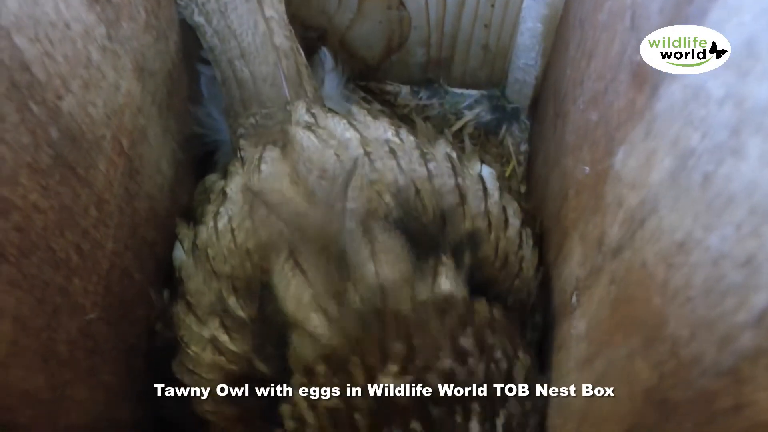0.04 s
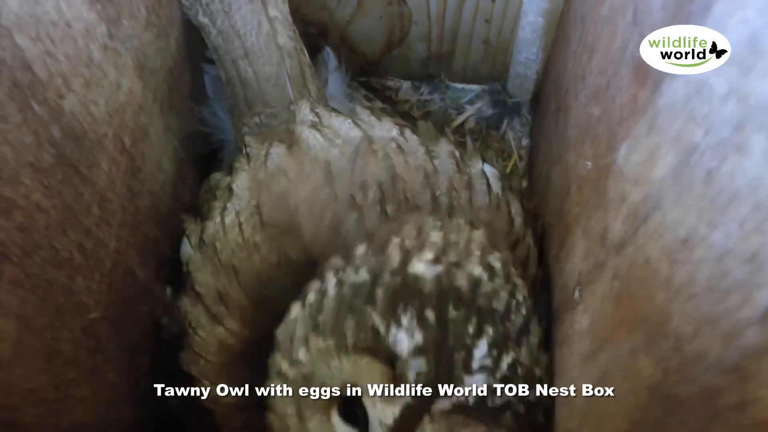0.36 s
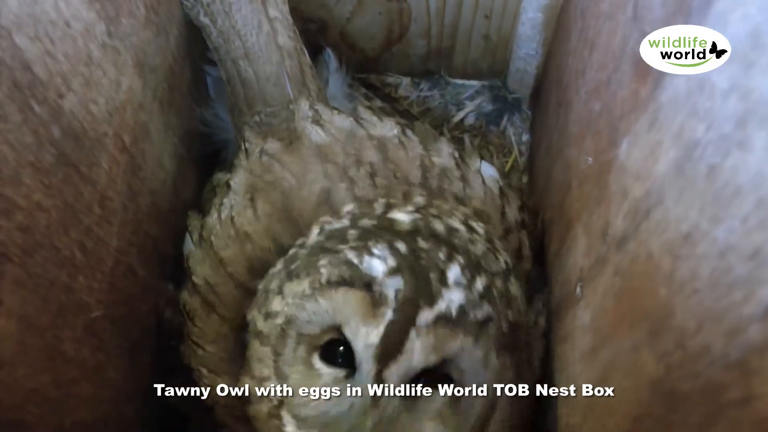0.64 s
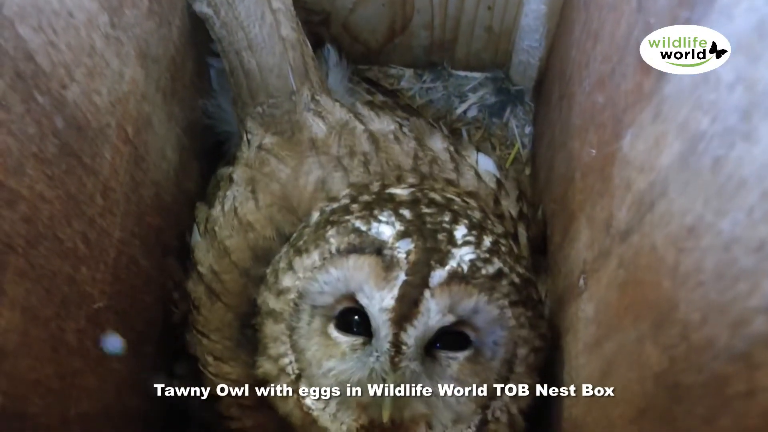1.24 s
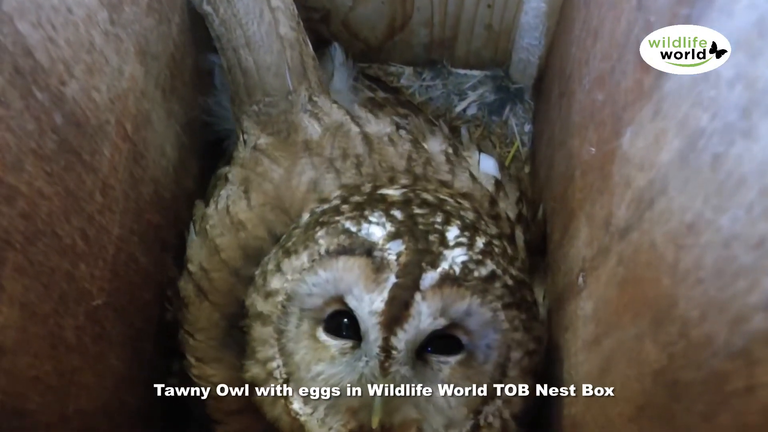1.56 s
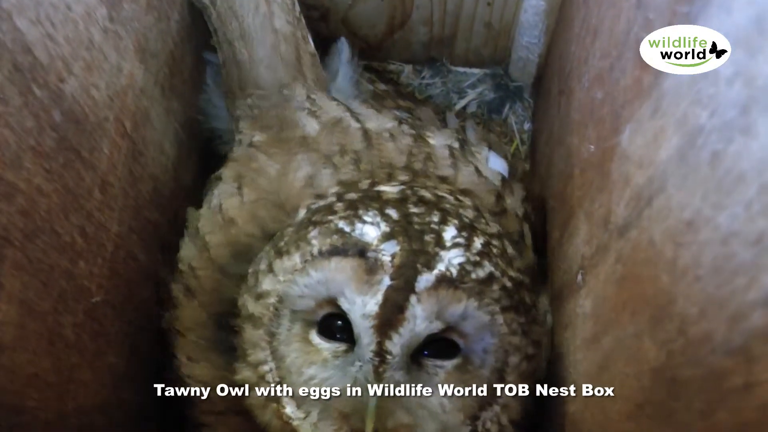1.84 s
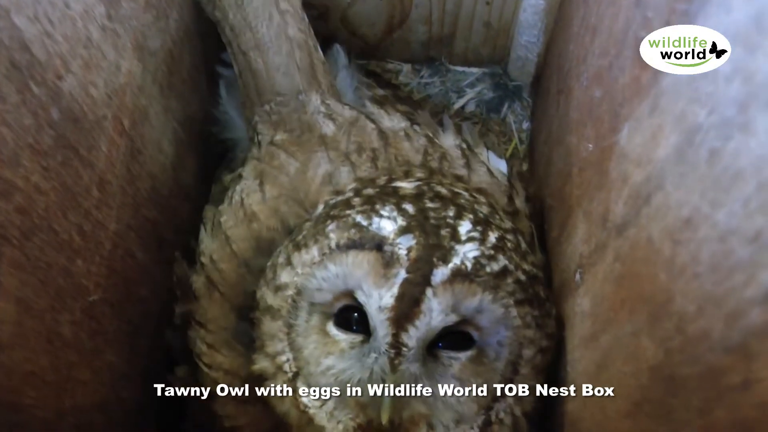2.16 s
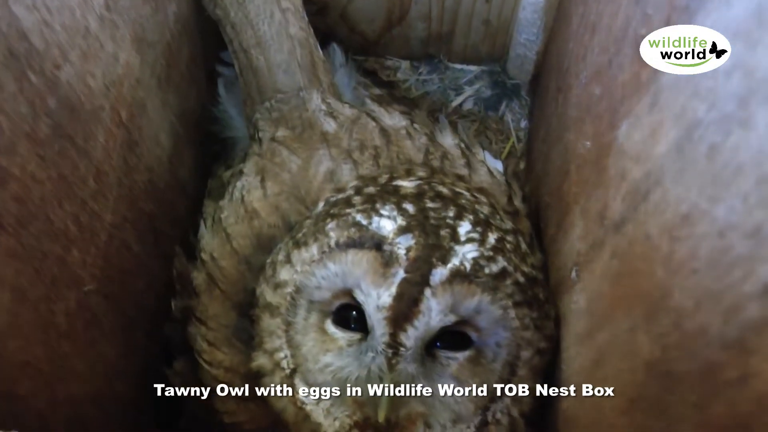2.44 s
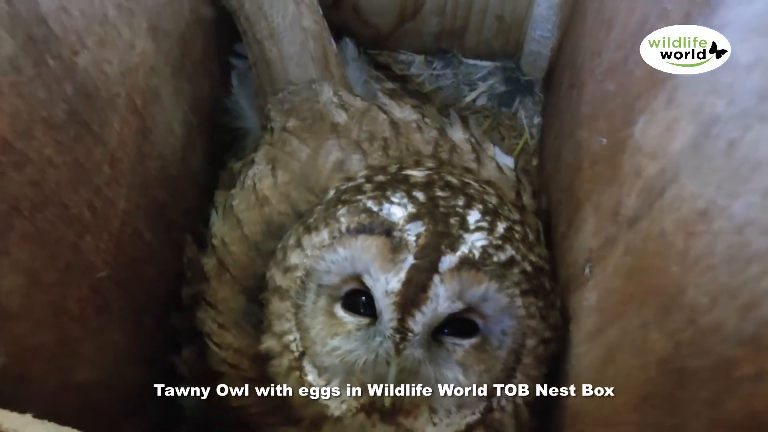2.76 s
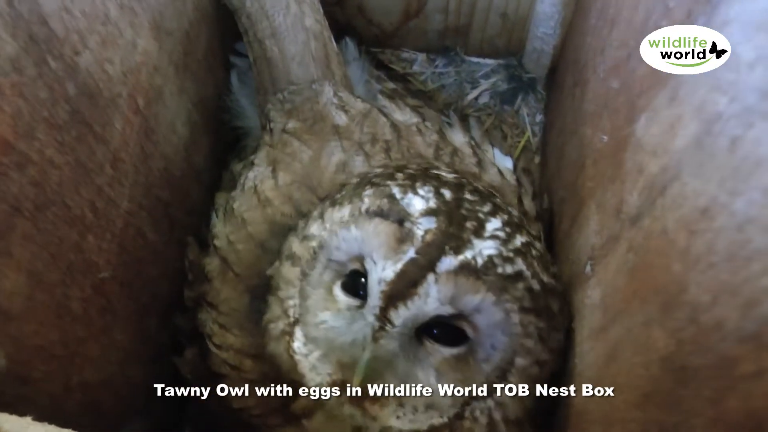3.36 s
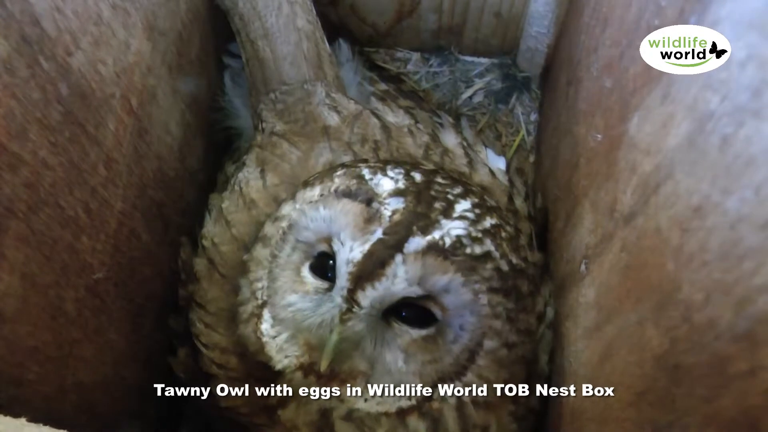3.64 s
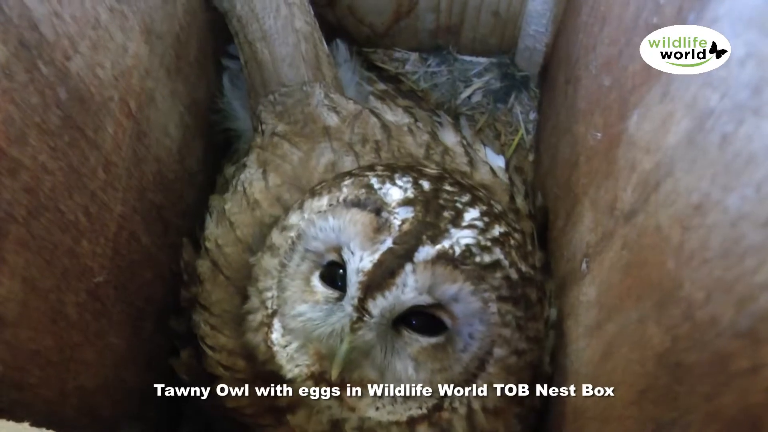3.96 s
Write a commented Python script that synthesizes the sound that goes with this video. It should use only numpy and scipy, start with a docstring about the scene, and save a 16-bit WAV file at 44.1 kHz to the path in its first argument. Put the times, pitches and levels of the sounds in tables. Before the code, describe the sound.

Songbirds chirp faintly outside while an owl shifts and bumps softly in a wooden box.

```python
"""Inside a wooden nest box an owl shifts: soft bumps ring the box and straw ticks, while songbirds
outside, blurred by the trees and the box, twitter and whistle a falling sweep. High buzzy notes follow.
Just before 2 s comes one brief scratchy rustle, then a second sweep, more bumps and three dull thuds.
A last sweep and a few faint calls close the scene. A low hum and quiet outdoor air lie under it all,
and the right microphone hears most of the sound."""
import sys
import numpy as np
from scipy import signal
from scipy.fft import rfft, irfft
from scipy.io import wavfile
from scipy.ndimage import uniform_filter1d

SR = 44100
rng = np.random.default_rng(int(sys.argv[2]) if len(sys.argv) > 2 else 0)


def master(y):
    """Save y as 16-bit WAV."""
    cut = np.clip(np.atleast_2d(y).T, -1, 1)
    pcm = np.round(cut * 32767)  # scale
    wavfile.write(sys.argv[1], SR, pcm.astype(np.int16))


N = 176400
TIME = np.arange(N) / SR
BODY_LEFT_DB, STRAW_LEFT_DB, BIRD_LEFT_DB, LEFT_LAG_S = -8.5, -16, -12.5, .0006


# The hollow ring of the box. Each row: mode in Hz, relative level in dB, seconds to fall 60 dB.
BOX_MODES = [(176.2, -1.5, 0.15), (253, 5, 0.058), (299.8, -1.5, 0.11), (358.3, -0.5, 0.05),
             (613, -6, 0.077), (663, -9, 0.067), (910, -17, 0.11), (1133, -17, 0.054)]
# The owl against the wood. Each row: start in seconds, peak in dB, ring centre in Hz, brightness in dB.
OWL_BUMPS = [(.004, -32, 233, -19), (0.028, -25, 216.4, -16), (0.043, -27.5, 240, -24),
             (.093, -16, 243, -16), (0.112, -24, 288, -22), (0.153, -26, 235, -18), (0.232, -18, 258, -26),
             (0.239, -24, 246, -20), (0.258, -22.5, 228, -6), (0.306, -28, 236, -22),
             (0.331, -22, 213.6, -14), (0.353, -28, 255, 0), (0.44, -34, 308, -24), (1.732, -29.5, 292, 8),
             (1.85, -26, 259, -20), (1.866, -21, 246, 7.5), (2.223, -15.5, 376, -8),
             (2.242, -29.5, 170, -11), (2.261, -25.5, 370, 2), (2.465, -29.5, 364, -4),
             (2.492, -36, 375, -20), (2.532, -26.5, 382, -10), (2.565, -22.5, 390, -16),
             (2.59, -24.5, 395, -13), (2.633, -30, 402, -17), (2.667, -15, 368, -2.5)]

def owl_bumps(contact_s=.0063, spread_oct=.24, bright_above_hz=480, left_db_per_oct=-7.5):
    """Soft blows ring the box; where and how hard they land picks the modes that speak."""
    out = np.zeros((2, N))
    t = np.maximum(np.arange(SR // 4) / SR - np.array([[LEFT_LAG_S], [0]]), 0)
    soft_onset = np.sin(np.pi / 2 * np.minimum(t / contact_s, 1)) ** 2
    for start, db, centre, bright_db in OWL_BUMPS:
        ring = 0
        for hz, mode_db, t60 in BOX_MODES:
            nearness = np.exp(-.5 * (np.log2(hz / centre) / spread_oct) ** 2)
            weight = undb(bright_db) if hz > bright_above_hz else nearness
            detune = 1 + .0085 * rng.standard_normal()
            mode = np.sin(2 * np.pi * hz * detune * t) * undb(mode_db - 60 * t / t60)
            left_db = BODY_LEFT_DB + left_db_per_oct * np.log2(hz / BOX_MODES[2][0])
            ring += weight * mode * undb([[left_db], [0]])
        ring *= soft_onset
        add(out, start, undb(db) * ring / np.abs(ring).max())
    return out


# The dry body of a tick, and the bright snap on top. Each row: frequency in Hz, gain in dB.
TICK_EQ = [(800, 3), (2000, 14), (3500, 10.5), (5500, 11.5), (7500, -10), (10000, -23), (15000, -30)]
SNAP_EQ = [(3500, -14), (7000, 4.5), (8500, 0.5), (10500, -1), (15000, -12)]
# Ticks in the straw. Each row: crest in seconds, level in dB, brightness in dB.
STRAW_TICKS = [(0.262, -46, -4), (0.536, -54, 5), (0.62, -43, -2.5), (0.839, -42, -9), (0.888, -57, 13),
               (1.458, -43, -12), (1.701, -40, -9.5), (2.225, -37, -13), (2.263, -44, -8),
               (2.565, -33.5, -10.5), (2.59, -59, -12), (2.667, -31.5, -5.5), (2.806, -37.5, -7),
               (3.494, -46, 1)]

def straw_ticks(rise_s=.0012, fall_s=.0024, snap_db=.5):
    """Single stalks tick, each a tiny burst of noise with a brighter snap."""
    ticks = [(s, rise_s, fall_s, db) for s, db, _ in STRAW_TICKS]
    snaps = [(s, rise_s, fall_s, db + bright + snap_db) for s, db, bright in STRAW_TICKS]
    return place(bursts(noise(), TICK_EQ, ticks) + bursts(noise(), SNAP_EQ, snaps), STRAW_LEFT_DB)


# The scratchy tone of the rustle. Each row: frequency in Hz, gain in dB.
RUSTLE_EQ = [(200, -41), (650, 0.5), (1400, -11.5), (2600, 0), (3200, -7.5), (4000, 6.5), (4800, -3),
             (5750, 4.5), (6600, -12), (8300, -10.5), (10000, -22.5), (15000, -36)]
# Strokes of feather and claw. Each row: crest, rise and fall in seconds, level in dB.
RUSTLE_STROKES = [(1.70, 0.017, 0.082, -45.5), (1.831, 0.015, 0.018, -30), (1.853, 0.0032, 0.007, -19),
                  (1.872, 0.014, 0.0087, -27)]

def rustle(grains_per_s=2600, spread_db=2):
    """Feather and claw catch on the straw in dense grains."""
    catches = rng.random(N) < grains_per_s / SR
    grains = catches * np.sign(noise()) * undb(spread_db * noise())
    return place(bursts(grains, RUSTLE_EQ, RUSTLE_STROKES), STRAW_LEFT_DB)


# The muffled tone of sliding. Each row: frequency in Hz, gain in dB.
SLIDE_EQ = [(100, -14), (170, -3.5), (300, 0.5), (470, -22), (650, 0.5), (1000, -17), (1200, -17),
            (2500, -26), (5000, -24), (12000, -48)]
# The owl's shuffles. Each row: crest, rise and fall in seconds, level in dB.
BODY_SLIDES = [(.25, 0.43, 0.23, -43), (1.85, .13, 0.085, -34.5), (2.26, 0.02, 0.036, -39),
               (2.59, 0.11, 0.11, -41)]

def body_slides():
    """The body slides over the nest in dull swells of noise."""
    return place(bursts(noise(), SLIDE_EQ, BODY_SLIDES), BODY_LEFT_DB)


# Dull weight in the low end. Each row: crest in seconds, pitch in Hz, level in dB.
LOW_THUDS = [(2.236, 122, -35.5), (2.798, 74, -37), (3.275, 104, -30.5)]

def thuds(rise_s=.017, fall_s=.019):
    """Each thud is a few cycles of a low sine that swell and die."""
    return sum(np.sin(2 * np.pi * hz * (TIME - s)) * swells([(s, rise_s, fall_s, db)])
               for s, hz, db in LOW_THUDS)


def sing(notes, crest, rough, echo_db, echo_t60, woodland_db, ease=0, taper=1):
    """Sine notes bend through three pitches; close surfaces blur them and the woodland rings on."""
    direct = np.zeros(N)
    wobble = 1 + rough * walk(rate_hz=355)
    for start, length, first, middle, last, db in notes:
        u = np.linspace(0, 1, int(length * SR))
        glide = u - ease * np.sin(2 * np.pi * u) / (2 * np.pi)  # ease flattens both ends
        bend = np.polyfit([0, .5, 1], [first, middle, last], 2)
        hz = np.polyval(bend, glide) * np.roll(wobble, -int(start * SR))[:len(u)]
        swell = np.sin(np.pi / 2 * np.interp(u, [0, crest, 1], [0, 1, 0])) ** taper
        tone = np.sqrt(2) * np.sin(2 * np.pi * np.cumsum(hz) / SR)
        add(direct, start, undb(db) * swell * tone)
    tails = [undb(echo_db) * echoes(echo_t60) + undb(woodland_db) * echoes(t60=1) for _ in range(2)]
    wet = np.array([signal.fftconvolve(direct, tail)[:N] for tail in tails])
    return place((direct + wet) / np.hypot(1, undb(echo_db)), BIRD_LEFT_DB)


# Bird notes. Each row: start and length in seconds, first, middle and last pitch in Hz, level in dB.
NEAR_SONG = [(.371, 0.037, 3850, 4140, 3000, -32.5), (.486, 0.02, 4470, 4080, 3300, -32.5),
             (.503, 0.026, 3460, 2876, 2600, -41), (.522, 0.012, 2930, 2700, 2580, -40),
             (.544, 0.017, 3030, 2690, 2540, -42.5), (.566, 0.011, 3210, 2710, 2500, -38),
             (.59, 0.012, 2890, 2704, 2550, -37.5), (.678, 0.05, 2640, 3067, 2710, -37.5),
             (.744, 0.049, 3430, 3455, 3110, -38.5), (.801, 0.025, 3270, 4304, 3540, -26),
             (.856, 0.0333, 3164, 4360, 3310, -30), (.92, 0.041, 3286, 4510, 3820, -33),
             (.986, 0.041, 4020, 4790, 4580, -40), (1.658, 0.016, 4580, 3800, 3750, -36),
             (2.116, .03, 3520, 3940, 4300, -39), (2.15, 0.11, 4000, 4270, 4390, -43),
             (2.245, 0.046, 4530, 4260, 3910, -41.5)]  # the nearer bird's twitter
SONG_TOP = [(0.83, 0.023, 6430, 6370, 5330, -50), (0.867, 0.04, 6400, 6700, 6440, -57),
            (0.927, 0.104, 6700, 6410, 6470, -57)]  # soft notes over its rising phrase
HOOKED_CHIRPS = [(1.677, 0.023, 3340, 3850, 4800, -30.5), (1.764, 0.025, 4310, 4100, 2710, -35.5),
                 (1.906, 0.037, 3920, 4095, 2400, -35.5), (1.977, .028, 3290, 3960, 2360, -34.5),
                 (2.04, 0.039, 3426, 3870, 2470, -39)]
HIGH_BUZZES = [(1.13, 0.049, 8100, 7290, 6950, -47.5), (1.17, 0.093, 7200, 7720, 7060, -54.5),
               (1.2, 0.12, 8500, 8020, 7200, -57), (1.298, 0.037, 7000, 7400, 7560, -41.5)]
FAR_CALLS = [(1.3, 0.048, 3400, 3650, 4400, -55.5), (1.43, 0.036, 4560, 4300, 3960, -53),
             (2.47, 0.052, 4980, 4500, 4270, -54.5), (2.745, .06, 3200, 2750, 2350, -54),
             (2.845, 0.04, 3540, 4220, 4880, -53), (3.08, .055, 3700, 4070, 5000, -61),
             (3.8, .055, 3400, 2800, 2400, -55), (3.925, 0.03, 4800, 4400, 3900, -55),
             (3.962, 0.04, 3280, 2900, 2400, -44)]
CLEAN_WHISTLES = [(1.3, 0.065, 6800, 6740, 6740, -44.5), (2.61, 0.1, 3150, 3410, 3180, -62),
                  (2.69, 0.14, 2800, 2660, 2500, -49.5), (3.75, 0.063, 8000, 7840, 7600, -62),
                  (3.75, 0.072, 4150, 4120, 4020, -54)]
FALLING_SWEEPS = [(.328, 0.19, 9480, 6185, 3850, -44.5), (2.096, 0.2, 9180, 5860, 3950, -43),
                  (3.56, .145, 7930, 5170, 4020, -51)]

def songbirds():
    """Birds call outside, each kind of note with its own roughness and blur."""
    song = sing(NEAR_SONG + SONG_TOP, crest=.45, rough=.022, echo_db=-5, echo_t60=.09, woodland_db=-6.5)
    chirps = sing(HOOKED_CHIRPS, crest=.55, rough=.05, echo_db=1, echo_t60=.06, woodland_db=-2)
    buzzes = sing(HIGH_BUZZES, crest=.35, rough=.045, echo_db=6, echo_t60=.2, woodland_db=1)
    calls = sing(FAR_CALLS, crest=.35, rough=.024, echo_db=3, echo_t60=.14, woodland_db=-3)
    whistles = sing(CLEAN_WHISTLES, crest=.35, rough=.004, echo_db=-6, echo_t60=.14, woodland_db=-8)
    sweeps = sing(FALLING_SWEEPS, crest=.8, rough=.045, echo_db=6, echo_t60=.16, woodland_db=-2,
                  ease=.3, taper=1.2)
    return song + chirps + buzzes + calls + whistles + sweeps


def distant_chorus(count=48, centre_hz=3200, note_s=.043, db=-62):
    """Distant birds scatter faint notes, random in time, pitch and bend."""
    notes = []
    for i, (jitter, pitch, bend) in enumerate(rng.standard_normal((count, 3))):
        start = (i + .51 * jitter) * N / SR / count
        pitches = centre_hz * np.exp(.17 * pitch + .066 * np.array([bend, 0, -bend]))
        notes.append((start, note_s, *pitches, db))
    return sing(notes, crest=.34, rough=.02, echo_db=5, echo_t60=.22, woodland_db=-2)


# Three low tones and a faint whine. Each row: pitch in Hz, level in dB, waver as a share of the tone.
HUM_TONES = [(73.7, -53, 0.73), (99.2, -52, 0.43), (112, -47.5, 0.25), (4850, -76.5, 1)]

def hum():
    """Held tones waver in level and phase."""
    out = 0
    for hz, db, waver in HUM_TONES:
        drift = 1 + waver * (walk(7.4) + 1j * walk(3.6))
        tone = np.exp(2j * np.pi * (hz * TIME + rng.random()))
        out += undb(db) * np.sqrt(2) * np.real(drift * tone)
    return out


# Outdoor air as it sounds in the box. Each row: frequency in Hz, noise density in dB per Hz.
AIR_SPECTRUM = [(140, -81), (230, -74.5), (260, -77.5), (295, -72), (340, -79), (480, -82.5), (610, -73.5),
                (648, -71.5), (668, -63.5), (695, -75.5), (850, -75), (1000, -82.5), (1170, -76.5),
                (1450, -85.5), (1590, -82.5), (1950, -90), (2150, -88), (2500, -89), (4000, -92.5),
                (6000, -101), (9000, -106.5), (15000, -105.5)]
# How alike the two sides are. Each row: frequency in Hz, correlation from 0 to 1.
AIR_CORRELATION = [(140, 0.11), (350, 0.12), (700, 0.057), (2000, 0.058), (12000, 0.86)]

def outdoor_air(swell_db=.5):
    """A wide, gently stirring hiss, coloured by the hollow of the box."""
    right, alike = noise(), per_bin(AIR_CORRELATION)
    left = irfft(alike * rfft(right) + np.sqrt(1 - alike ** 2) * rfft(noise()), N)
    hiss = colour(np.array([left, right]), AIR_SPECTRUM) * np.sqrt(SR / 2)
    return hiss * undb(swell_db * walk(9.1))


# The deep floor. Each row: frequency in Hz, noise density in dB per Hz before the ebb.
RUMBLE_SPECTRUM = [(15, -87), (30, -89), (60, -69), (80, -67), (110, -59), (130, -85), (200, -144),
                   (1000, -160)]
# The slow fader move on hum and rumble. Each row: time in seconds, gain in dB.
EBB = [(0, -2), (.2, 1.5), (1.1, 0), (1.4, -2), (3.4, -2), (3.7, -5.5)]
# The duller left side of air and hum. Each row: frequency in Hz, gain in dB.
LEFT_EQ = [(120, 1.5), (300, -2), (650, -13), (1500, -8), (4000, -13), (8700, -4.5), (10000, -31),
           (15000, -29)]

def background():
    """Hum and low rumble slowly ebb beneath the air."""
    ebb = undb(np.interp(TIME, *np.array(EBB).T))
    left, right = hum() * ebb + outdoor_air()
    rumble = colour(noise(), RUMBLE_SPECTRUM) * np.sqrt(SR / 2)
    return np.array([colour(left, LEFT_EQ), right]) + rumble * ebb


def undb(db):
    """Decibels to gain."""
    return 10 ** (np.asarray(db) / 20)


def unit(x):
    """Scale to an rms of 1."""
    return x / np.sqrt(np.mean(x ** 2))


def per_bin(points):
    """Spread a (Hz, value) table over all frequencies."""
    hz, value = np.array(points, float).T
    bin_hz = np.maximum(np.arange(N // 2 + 1) * SR / N, 1)
    return np.interp(np.log(bin_hz), np.log(hz), value)


def colour(x, eq):
    """Filter by a (Hz, dB) table."""
    return irfft(rfft(x) * undb(per_bin(eq)), N)


def noise():
    """White noise."""
    return rng.standard_normal(N)


def walk(rate_hz):
    """Smooth random drift with an rms of 1."""
    width = int(SR / rate_hz)
    smoothed = uniform_filter1d(noise(), width, mode="wrap")
    return unit(uniform_filter1d(smoothed, width, mode="wrap"))


def add(track, start, x):
    """Mix x into the track at a time in seconds."""
    i = max(int(start * SR), 0)
    track[..., i:i + x.shape[-1]] += x[..., :max(N - i, 0)]


def place(x, left_db):
    """Stereo, with a weaker and slightly later left side."""
    left, right = np.broadcast_to(x, (2, N))
    return np.array([undb(left_db) * np.roll(left, int(LEFT_LAG_S * SR)), right])


def swells(gestures):
    """Envelope of gestures that rise to a crest and die away, summed in power."""
    shapes = (undb(db) * np.exp(-np.maximum((crest - TIME) / rise, (TIME - crest) / fall))
              for crest, rise, fall, db in gestures)
    return np.sqrt(sum(shape ** 2 for shape in shapes))


def bursts(texture, eq, gestures):
    """Colour a texture and let it swell with each gesture."""
    return unit(colour(texture, eq)) * swells(gestures)


def echoes(t60):
    """A diffuse tail of unit energy that falls 60 dB in t60 seconds."""
    tail = noise() * undb(-60 * TIME / t60)
    return tail / np.sqrt(np.sum(tail ** 2))


def scene():
    """Birds outside, the owl inside, low thuds and the background."""
    birds = songbirds() + distant_chorus()
    owl = owl_bumps() + straw_ticks() + rustle() + body_slides()
    return birds + owl + thuds() + background()


def record(dry):
    """The camera cuts the treble steeply above 14.9 kHz."""
    return signal.sosfilt(signal.ellip(10, .1, 80, 14900, fs=SR, output="sos"), dry)


dry = scene()
out = record(dry)
master(out)
```